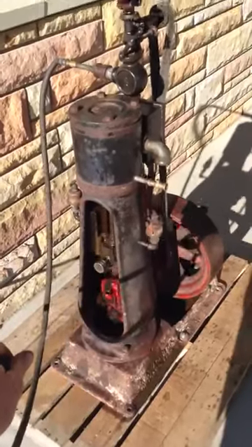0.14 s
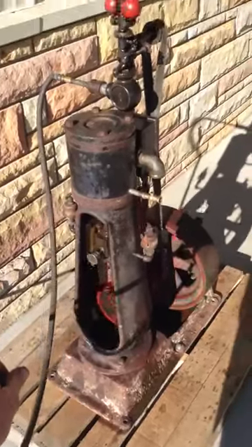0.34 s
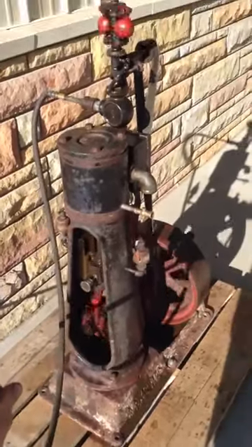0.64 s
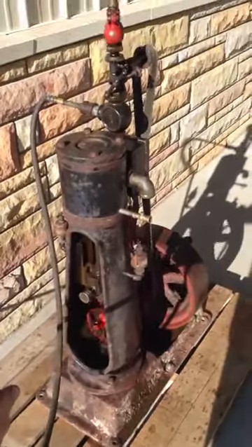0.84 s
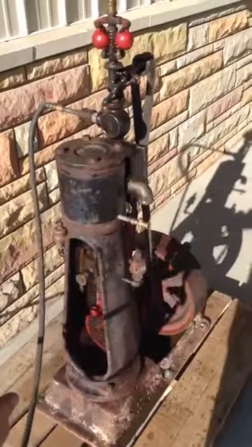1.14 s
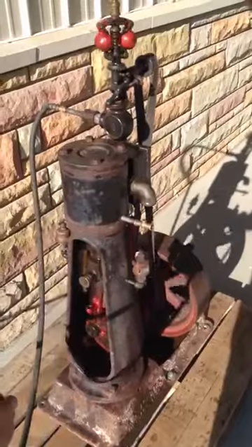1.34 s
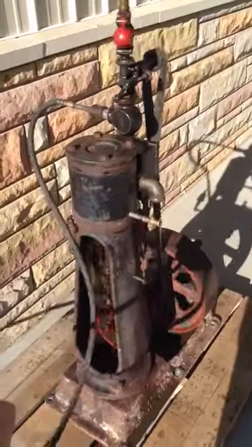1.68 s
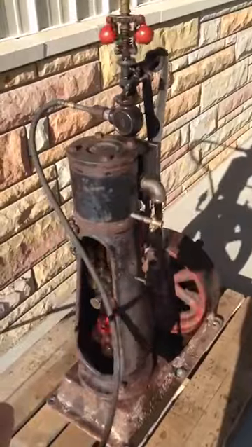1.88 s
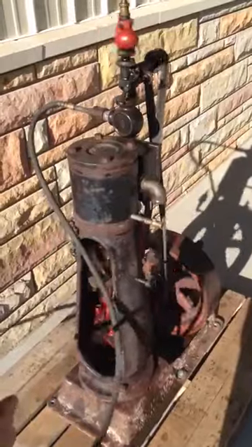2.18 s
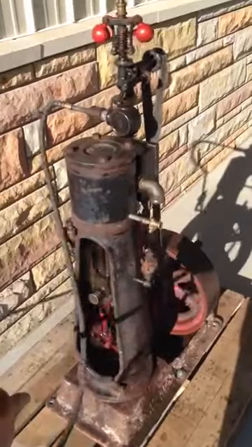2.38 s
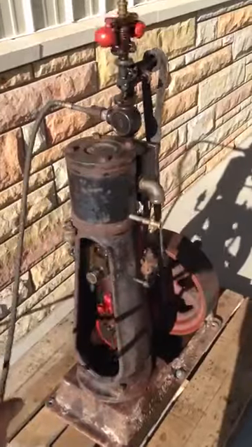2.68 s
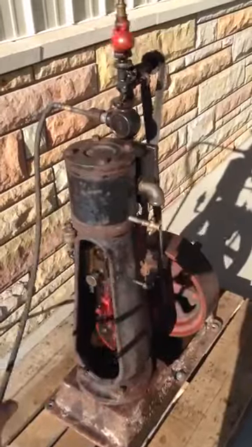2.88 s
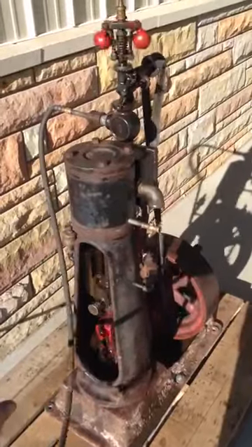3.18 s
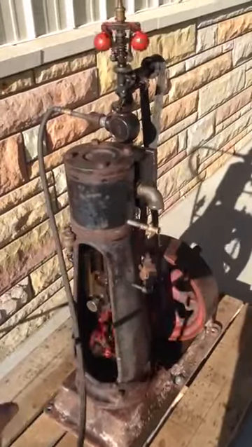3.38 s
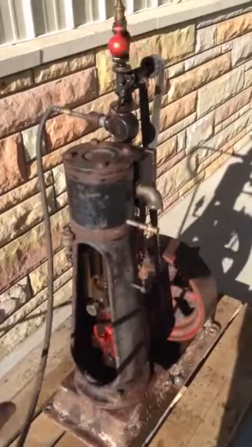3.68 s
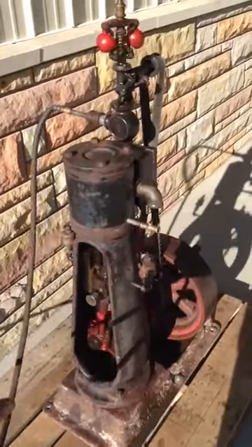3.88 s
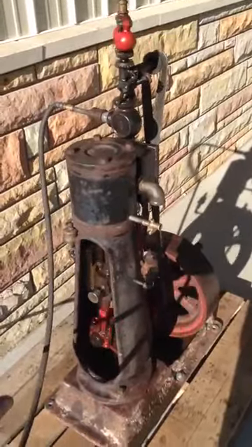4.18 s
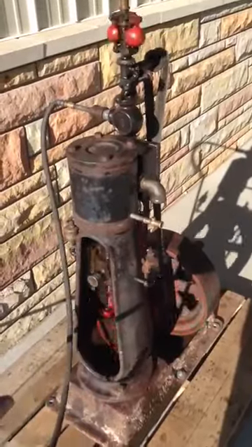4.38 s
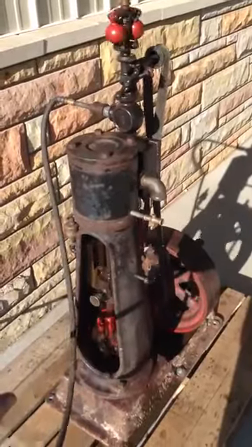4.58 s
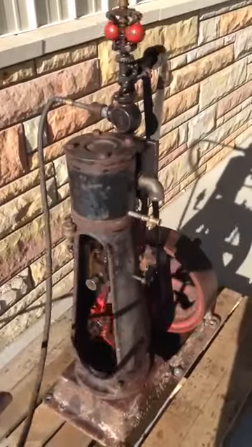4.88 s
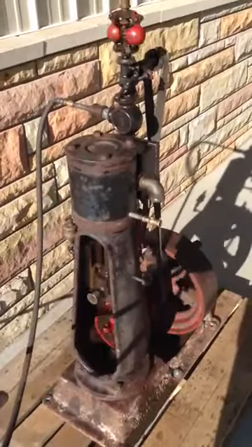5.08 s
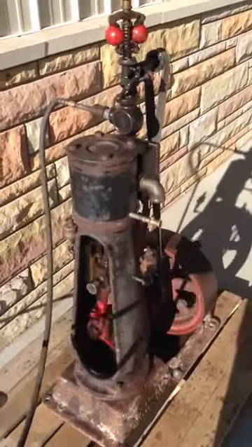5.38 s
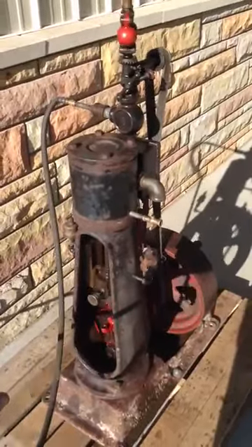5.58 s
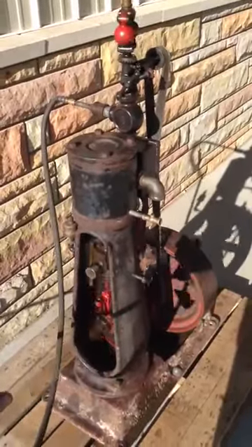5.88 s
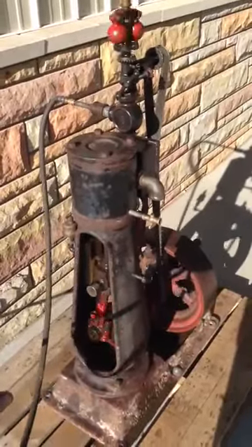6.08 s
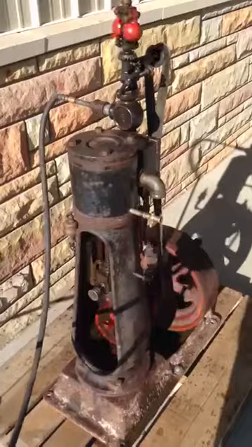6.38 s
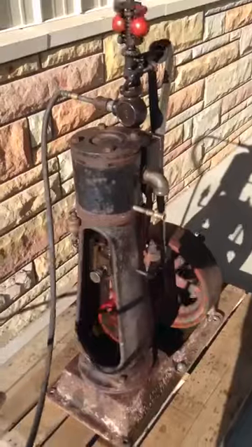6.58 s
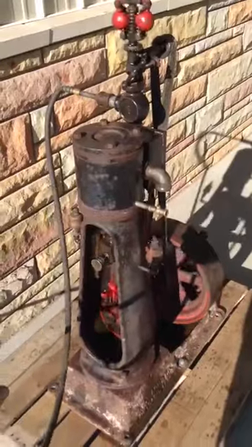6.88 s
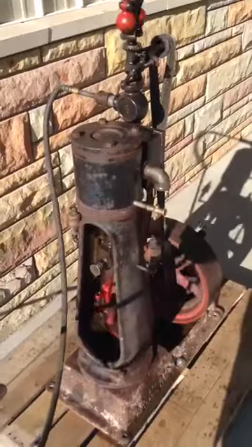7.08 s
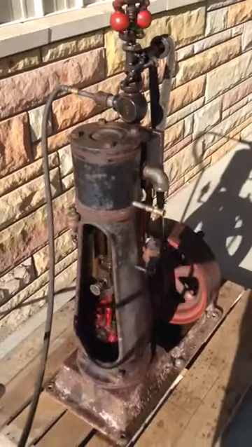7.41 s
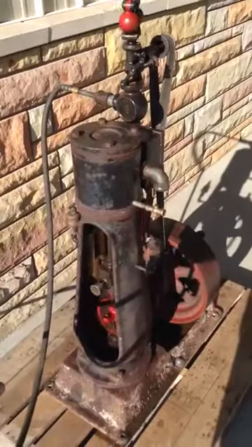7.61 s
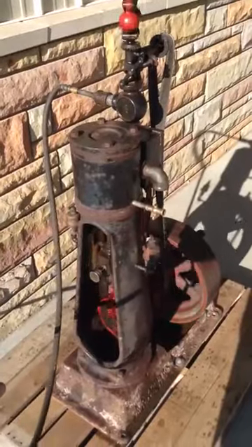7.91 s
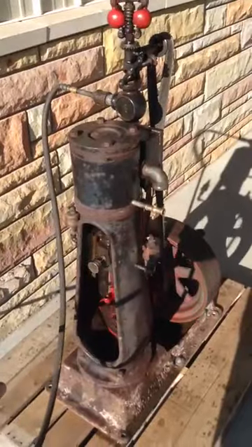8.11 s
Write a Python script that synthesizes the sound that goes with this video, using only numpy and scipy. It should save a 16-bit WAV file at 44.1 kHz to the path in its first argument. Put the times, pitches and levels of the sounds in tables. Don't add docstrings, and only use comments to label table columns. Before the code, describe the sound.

A valve hisses faintly, then a burst of compressed air drives rapid hard chuffs from a small engine, which slow into soft puffs and thumps.

```python
import sys
import numpy as np
from scipy import signal
from scipy.io import wavfile
from scipy.ndimage import uniform_filter1d

SR = 44100
rng = np.random.default_rng(int(sys.argv[2]) if len(sys.argv) > 2 else 0)


def int16_out(signal):
    q = np.round(np.clip(np.atleast_2d(signal).T, -1, 1) * 32767)
    wavfile.write(sys.argv[1], SR, q.astype(np.int16))


def magnitude_from_level(level_db):
    exponent = np.asarray(level_db, float) / 20
    return 10 ** exponent


N = 363825

# time in seconds, puff in dB, thump in dB.
UPPER_CENTRES = [(2.461, -55, -20), (2.62, -22, -22), (2.799, -16, -23), (2.988, -17, -22.5),
                 (3.19, -18, -25.5), (3.418, -17.5, -25), (3.667, -23, -29), (3.916, -23.5, -30),
                 (4.209, -26, -28.5), (4.531, -23, -30), (4.904, -24.5, -32.5), (5.354, -27.5, -32.5),
                 (5.939, -31, -44)]
# time in seconds, puff in dB, thump in dB, dip while the ports are shut before it in dB.
LOWER_CENTRES = [(2.546, -17, -31, -2.5), (2.703, -31, -25.5, 0), (2.882, -24, -26, 0.5),
                 (3.09, -47, -26, -1), (3.321, -30, -34, -2.5), (3.555, -25.5, -30, -4),
                 (3.8, -27.5, -35.5, -9), (4.075, -27.5, -42, -7), (4.382, -28, -35, -8),
                 (4.732, -32, -37, -8.5), (5.149, -33.5, -38, -5), (5.661, -34.5, -44, -7),
                 (6.383, -46, -46, -6)]
# time in seconds, puff in dB, dip before it in dB.
MIDWAY_PORTS = [(2.583, -16, -11), (2.679, -38, -4), (2.723, -39, -4.5), (2.91, -25, -2), (2.957, -21, -11),
                (3.038, -39, 1), (3.148, -22, -7), (3.258, -24, -3.5), (3.614, -25, -5.5),
                (3.722, -27.5, 0), (3.855, -44, -7), (4.132, -29, -4), (4.259, -31, -3.5),
                (4.444, -29.5, -0.5), (4.589, -31, 4), (4.829, -29, -4), (4.989, -32.5, 1),
                (5.253, -33.5, -1), (5.592, -46, -3), (5.811, -38.5, -3), (6.029, -52, 5)]
# time in seconds, puff in dB, dip before it in dB.
VALVE_SNAPS = [
    (5.459, -30.5, -3.5),
    (6.084, -28.5, -4),
]


def exhaust(flow, jet):
    # start in seconds, peak in dB, low modes in dB, hold in seconds, decay in seconds.
    driven_chuffs = [(1.727, -2, -4, 0.028, 0.054), (1.894, 2, -5.5, 0.019, 0.052),
                     (1.949, -7.5, 0.5, .017, 0.052), (2.007, 0.5, -6.5, 0.031, 0.022),
                     (2.058, -4, 0, 0.026, 0.037), (2.107, 1, -2, 0.024, 0.013),
                     (2.155, -7, 2, 0.021, .018), (2.201, -1, -11, 0.021, 0.0096),
                     (2.25, -8, 2, 0.014, 0.019), (2.288, 0, -5.5, 0.012, 0.045),
                     (2.376, -1, -4, 0.015, 0.0057), (2.43, -9.5, -22, .017, 0.022)]
    # frequency in Hz, width in Hz, level in dB.
    driven_modes = [(976, 60, 4.5), (1760, 190, 6), (2040, 90, 4), (3150, 200, -4), (3650, 160, -1),
                    (4090, 170, -4), (4730, 300, -8.5), (5240, 120, -3), (6150, 60, -8)]
    coasting_modes = [(1739, 110, 2), (2065, 74, 4.5), (2298, 59, 1.5), (3185, 564, -2.5), (4010, 88, -9),
                      (4874, 114, 3), (5204, 65, 1.5), (5450, 150, -5), (5900, 27, -1), (6430, 190, -6),
                      (7870, 720, -8)]
    # frequency in Hz, level in dB.
    blast_colour = [(180, -37), (300, -6.5), (534, -20.5), (1000, -9), (1480, -10), (1740, -6), (2490, -14),
                    (3970, -9), (8000, -17.5), (10400, -15.5), (17600, -120)]
    flow_colour = [(290, 15), (500, -10.5), (786, -20), (1040, 12.5), (1490, -13.5), (2030, 5.5),
                   (2680, -19.5), (3610, 3), (7000, -12), (9100, -33), (15400, -120)]
    jet_colour = [(3240, -44), (5500, -5), (8340, 2.5), (10800, 2.5), (12900, -5.5), (14700, 8),
                  (15500, -10)]
    # frequency in Hz, width in Hz, level in dB.
    mouth_modes = [(6250, 150, -3), (7700, 250, -3), (8450, 200, -2), (10150, 200, -4), (11350, 250, -3),
                   (13000, 250, -3)]
    driven_from_s, driven_to_s = 1.7, 2.52
    bright_db, rise_s = 0.3, 0.0034
    jet_lag_s = 0.0046

    t = np.arange(N) / SR
    driven = np.clip(np.minimum(t - driven_from_s, driven_to_s - t) / 0.01, 0, 1)
    flow = flow * magnitude_from_level(-9 * np.clip((t - 6.5) / 0.87, 0, 1))
    chuffs = [(s, db, low_db, bright_db, decay, rise_s, hold) for s, db, low_db, hold, decay in driven_chuffs]
    hard = strokes(chuffs, crest_db=14.5)
    soft = strokes(puffs(), crest_db=11.0)

    blast = pipe(driven_modes, blast_colour, ring_db=-1.5, patchy_db=3.0, ticks_per_s=500, tick_db=-2.0)
    coast = pipe(coasting_modes, flow_colour, ring_db=0.0, patchy_db=3.5, ticks_per_s=200, tick_db=-0.5)
    out = blown(blast, flow * np.sqrt(driven), hard, lowest_hz=905)
    out += blown(coast, flow * np.sqrt(1 - driven), soft, lowest_hz=1430)

    jet_power = hard[2] + np.roll(soft[2], round(jet_lag_s * SR)) + jet ** 2
    jet_hiss = hiss_through(coloured(jet_colour, patchy_db=2.0, rate=35.0), mouth_modes)
    return out + np.sqrt(jet_power) * jet_hiss


def puffs():
    # time in seconds, level in dB.
    creep_puffs = [
        (.004, -34.5),
        (0.265, -31.5),
        (.509, -35),
    ]
    usual_turn_s, upper_lead_s = 0.17, 0.013
    slow_dull_db = -8
    stretch = (np.gradient([row[0] for row in UPPER_CENTRES]) / usual_turn_s) ** 0.37
    out = []
    for (s, db, _), k in zip(UPPER_CENTRES, stretch):
        out.append((s - upper_lead_s * k, db, -6, slow_dull_db * (k - 1), 0.011, 0.011 * k, 0.024 * k))
    kinds = [(LOWER_CENTRES, (3.2, 0, 0.0041, 0.003, 0.012)),
             (MIDWAY_PORTS, (-4.5, -5.5, 0.041, 0.005, 0.014)),
             (VALVE_SNAPS + creep_puffs, (-1.1, -3, 0.01, 0.002, 0.012))]
    return out + [(*row[:2], *kind) for rows, kind in kinds for row in rows]


def strokes(rows, crest_db):
    power = np.zeros((3, N))
    for s, peak_db, low_db, bright_db, decay, rise_s, hold in rows:
        at = round(s * SR)
        t = np.arange(min(SR // 2, N - at)) / SR
        opening = 1 - np.exp(-t / max(rise_s, .0005))
        bleeding = np.exp(-np.maximum(t - hold, 0) / max(decay, .003))
        gains = magnitude_from_level(peak_db - crest_db + np.array([[low_db], [0], [bright_db]]))
        power[:, at:at + len(t)] += (gains * opening * bleeding) ** 2
    return power


def pipe(modes, colour, ring_db, patchy_db, ticks_per_s, tick_db):
    struck = rng.random(N) < ticks_per_s / SR
    force = magnitude_from_level(1.5 * np.minimum(rng.exponential(1, N), 4))
    rattle = struck * force * rng.choice([-1, 1], N)
    drive = rng.standard_normal(N) + magnitude_from_level(tick_db) * rms_one(rattle)
    rings = np.zeros(N)
    for k, (hz, width, db) in enumerate(modes):
        mode = resonate(resonate(drive, hz, 1.45 * width), hz, 1.45 * width)
        rings += (-1) ** k * magnitude_from_level(db + patchy_db * drift(25.5)) * mode
    return rms_one(magnitude_from_level(ring_db) * rms_one(rings) + coloured(colour, patchy_db=2.5, rate=26.0))


def blown(sound, steady, power, lowest_hz):
    low, high = cut(sound, 2600, "low"), cut(sound, 2600, "high")
    below, pair = cut(low, lowest_hz, "low"), cut(low, lowest_hz, "high")
    out = steady * magnitude_from_level(-12.5) * rms_one(below)
    out += np.sqrt(power[0] + (steady * magnitude_from_level(-4.5)) ** 2) * rms_one(pair)
    return out + np.sqrt(power[1] + (steady * magnitude_from_level(-2.5)) ** 2) * rms_one(high)


def port_gain():
    # time in seconds, depth in dB, half length in seconds.
    driven_laps = [
        (1.713, -21, 0.0067),
        (1.865, -4.5, 0.063),
    ]
    lower_s, midway_s = 0.023, 0.021
    t = np.arange(0, N + 20, 20) / SR
    dips = driven_laps + [(s - lower_s, db, 0.023) for s, _, _, db in LOWER_CENTRES]
    dips = dips + [(s - midway_s, db, 0.0064) for s, _, db in MIDWAY_PORTS]
    dips = dips + [(s - lower_s, db, 0.023) for s, _, db in VALVE_SNAPS]
    gain_db = sum(db * np.exp(-((t - s) / half) ** 2) for s, db, half in dips)
    return np.interp(np.arange(N) / SR, t, magnitude_from_level(gain_db))


def crank_half_turns():
    centres = np.sort([row[0] for row in UPPER_CENTRES + LOWER_CENTRES])
    return np.interp(np.arange(N) / SR, centres, np.arange(len(centres)), left=-.5, right=-.5)


def stroke_gain(half_turns):
    # first half of the travel in dB, second half in dB.
    stroke_rings = [(3, -6), (2.5, 4.5), (1, 4), (-3, 6.5), (-5, -8), (-11, 11), (2, 6), (0, 10), (-2, 1),
                    (-12, 10), (-10, 1), (-1, 2), (-2, 7), (-3, 4), (-2, 1), (-1, 1), (1, 5), (0, 6),
                    (4, 7), (-5, 12), (6, 4), (-4, 5), (4, -11), (-17, 5.5), (2, 3)]
    return np.interp(2 * half_turns - .5, np.arange(2 * len(stroke_rings)), np.ravel(stroke_rings), left=0)


def cylinder_ring():
    hz, width_hz = 1023.5, 12.8
    once = resonate(rng.standard_normal(N), hz, width_hz)
    return evened(resonate(once, hz, 6.1 * width_hz), window_s=0.016)


def thumps():
    # time in seconds, peak in dB,
    # pitch in Hz.
    further_thumps = [(0.029, -40.5, 265), (0.277, -43, 226), (.39, -43, 287), (0.519, -34.5, 303),
                      (.713, -55, 208), (0.906, -45, 305), (0.98, -41, 293), (1.061, -48, 192),
                      (1.502, -43, 202), (1.555, -38.5, 208), (1.902, -24, 350), (1.951, -29, 217),
                      (2.014, -31, 326), (2.094, -22, 321), (2.19, -26, 288), (2.289, -28, 293),
                      (2.35, -23, 228), (5.46, -53, 232), (6.077, -44.5, 280)]
    lag_s, rise_s, decay_s = 0.00384, 0.0047, 0.011
    out, t = np.zeros(N + SR), np.arange(SR // 5) / SR
    centres = [(row[0] + lag_s, row[2], 287.3) for row in UPPER_CENTRES]
    centres += [(row[0] + lag_s, row[2], 280) for row in LOWER_CENTRES]
    bounces = [(s + .026, db - 9, hz * 1.1) for s, db, hz in centres]
    for s, peak_db, hz in further_thumps + centres + bounces:
        shape = (1 - np.exp(-t / rise_s)) * np.exp(-t / decay_s)
        turn = 2 * np.pi * hz * t * (1 + 2.5 * t)
        wave = np.sin(turn) + 0.27 * np.sin(1.2 * turn) * np.exp(-t / 0.025)
        wave += 0.36 * np.sin(2 * np.pi * 221 * t) * np.exp(-t / 0.034)
        wave += 0.04 * np.sin(2 * np.pi * 80 * t)
        out[round(s * SR):][:len(t)] += magnitude_from_level(peak_db + 4.5) * shape * wave
    return out[:N]


def ticks():
    # time in seconds, peak in dB.
    crosshead_ticks = [
        (.705, -30),
        (3.427, -20),
        (3.925, -23),
        (4.214, -21),
        (4.535, -30),
        (5.593, -38),
    ]
    out, t = np.zeros(N), np.arange(SR // 50) / SR
    for s, peak_db in crosshead_ticks:
        contact = np.exp(-t / .003) * rng.standard_normal(len(t))
        out[round(s * SR):][:len(t)] += magnitude_from_level(peak_db - 4) * contact
    return cut(cut(out + 1e-18, 2500, "high", order=2), 10000, "low", order=2)


def knocks():
    # time in seconds, level in dB, scatter in seconds.
    slack_knocks = [
        (0.711, -37.5, 0.016),
        (1.502, -39, 0.12),
        (6.088, -39, 0.015),
    ]
    # frequency in Hz, level in dB, 60 dB decay time in seconds.
    linkage_modes = [(476, 1, 0.03), (700, -2, 0.025), (856, -3, 0.025), (1150, -2, .018), (1420, -5, 0.02),
                     (2390, -3, 0.012), (3220, -6, 0.012), (4700, -8, .025)]
    contact, t = np.zeros(N), np.arange(SR // 5) / SR
    for s, level_db, scatter in slack_knocks:
        contact[round(s * SR):][:len(t)] += magnitude_from_level(level_db) * np.exp(-t / scatter) * rng.standard_normal(len(t))
    return sum(magnitude_from_level(db + 14.5) * resonate(contact + 1e-18, hz, 1.63 / t60) for hz, db, t60 in linkage_modes)


def wheezes():
    # start in seconds, low pair in dB, high pair in dB, hold in seconds, decay in seconds.
    faint_wheezes = [(0.26, -42, -54, 0.0091, 0.0069), (0.506, -51, -55, 0.027, 0.026),
                     (0.862, -58, -70, .07, .02), (1.332, -46, -70, .012, 0.0071),
                     (4.081, -35, -50, 0.0079, .004), (4.729, -41, -54, 0.011, .01),
                     (5.147, -38.5, -45, .011, 0.0063), (5.661, -45, -59, 0.01, 0.016),
                     (6.382, -49.5, -53, 0.014, .008), (6.46, -59, -70, .02, .015),
                     (6.594, -62, -73, 0.025, .015), (6.80, -59, -55, .06, .02),
                     (6.9, -56, -55, .015, .012), (7.155, -53.5, -68, 0.013, 0.0091),
                     (7.823, -49, -66, 0.038, .006), (7.875, -49.5, -52, .025, 0.022),
                     (7.925, -57, -64, .02, 0.085)]
    # frequency in Hz, width in Hz.
    low_pair = [(1800, 110), (2060, 90)]
    high_pair = [(3900, 400), (4900, 110)]
    level, t = np.zeros((2, N)), np.arange(SR // 4) / SR
    for s, low_db, high_db, hold, decay in faint_wheezes:
        shape = (1 - np.exp(-t / 0.0028)) * np.exp(-np.maximum(t - hold, 0) / decay)
        level[:, round(s * SR):][:, :len(t)] += magnitude_from_level(np.array([[low_db], [high_db]])) * shape
    white = rng.standard_normal(N)
    pairs = []
    for modes in (low_pair, high_pair):
        rings = sum(resonate(resonate(white, hz, w), hz, 2 * w) for hz, w in modes)
        pairs.append(evened(rings, window_s=0.0057))
    return np.sum(level * pairs, axis=0)


def squeaks():
    lift = whistle(1.676, .017, -19, from_hz=11300, to_hz=9300, breath_hz=600, tone=1.1, bend=1.5)
    creak = whistle(6.28, .09, -60, from_hz=3680, to_hz=3350, breath_hz=70, tone=1.3, bend=.45)
    chirp = whistle(7.93, .035, -61, from_hz=3850, to_hz=4080, breath_hz=90, tone=1, bend=1)
    return lift + creak + chirp


def whistle(s, half, level_db, from_hz, to_hz, breath_hz, tone, bend):
    u = (np.arange(N) / SR - s) / half
    hz = from_hz + (to_hz - from_hz) * np.clip((u + 1) / 2, 0, 1.3) ** bend
    breath = rms_one(cut(rng.standard_normal(N), breath_hz, "low", order=2))
    return magnitude_from_level(level_db) * np.exp(-u ** 2) * (tone + breath) * np.sin(2 * np.pi * np.cumsum(hz) / SR)


def wall(x):
    # delay in seconds, level in dB.
    wall_echoes = [(.0045, -16), (.011, -14.5), (.023, -16)]
    dull = signal.lfilter([.5], [1, -.5], x)
    return x + sum(magnitude_from_level(db) * np.pad(dull, (round(s * SR), 0))[:N] for s, db in wall_echoes)


def valve_leak():
    # time in seconds, level in dB.
    early_leak = [(0.0, -43.5), (.1, -47), (.35, -46), (.522, -42), (.6, -45), (.69, -44.5), (.71, -41.5),
                  (.8, -42), (1.0, -43), (1.408, -41.5), (1.518, -28), (1.65, -30), (1.672, -25),
                  (1.7, -31), (1.72, -30)]
    late_leak = [(6.2, -86), (6.32, -54), (6.46, -42.5), (6.77, -42), (6.86, -37), (6.91, -40),
                 (8.17, -40.5), (8.25, -37)]
    # frequency in Hz, level in dB.
    early_colour = [(1470, -48), (2500, -10.5), (3050, -12.5), (4010, -6), (5970, -1.5), (14100, 0),
                    (15500, -4)]
    late_colour = [(1470, -52), (2500, -16.5), (3160, -12), (5930, -3.5), (11000, 2), (14100, 4),
                   (15300, -7)]
    # frequency in Hz, width in Hz, level in dB.
    valve_modes = [(6170, 200, -7), (7200, 300, -7), (8550, 350, -4), (9890, 300, -7), (11300, 400, -5),
                   (12800, 250, -6), (13700, 250, -8)]
    hiss = magnitude_from_level(4.5) * in_time(early_leak)[0] * coloured(early_colour, patchy_db=0.65, rate=17)
    hiss = hiss + in_time(late_leak)[0] * coloured(late_colour, patchy_db=0.5, rate=25)
    return np.sqrt(np.mean(hiss ** 2)) * hiss_through(hiss, valve_modes)


def frame_rumble(pause):
    # time in seconds, level in dB.
    wheel_shake = [(0.0, -53), (1.0, -60), (1.4, -71), (1.54, -47.5), (1.7, -55), (1.9, -37.5),
                   (2.5, -36.5), (5.8, -56), (6.25, -63.5), (8.25, -74)]
    # frequency in Hz, level in dB.
    rumble_colour = [(24, -72), (40, -40.5), (199, -2), (241, -7), (300, -7), (371, -14.5), (455, -4),
                     (560, -6), (700, -11), (910, -36), (1540, -120)]
    calm_db = -1.5 * (1 - pause)
    return in_time(wheel_shake)[0] * magnitude_from_level(calm_db) * coloured(rumble_colour, patchy_db=2.5, rate=9.3)


def quiet_yard():
    # frequency in Hz, level in dB.
    yard_colour = [(24, -82), (40, -37.5), (200, -3), (500, -25), (570, -15), (963, -9.5), (1180, -15.5),
                   (1250, -14), (3500, -15.5), (4550, -51), (7700, -120)]
    return magnitude_from_level(-58.5) * coloured(yard_colour, patchy_db=2.5, rate=4.0)


def hiss_through(x, modes):
    return rms_one(x + sum(magnitude_from_level(db + 4 * drift(3.0)) * resonate(x, hz, w) for hz, w, db in modes))


def coloured(spectrum, patchy_db, rate):
    hz, level = np.transpose(spectrum)
    bands = round(3 * np.log2(hz[-1] / hz[0])) + 1
    edges = np.geomspace(hz[0], min(hz[-1], .45 * SR), bands + 1)
    white, together, out = rng.standard_normal((2, N)), drift(rate), 0
    for k, (low, high) in enumerate(zip(edges, edges[1:])):
        band = cut(white[k % 2], [low, high], "band", order=2)
        centre_db = np.interp(np.log(low * high) / 2, np.log(hz), level)
        out = out + band * magnitude_from_level(centre_db + patchy_db * (0.33 * together + drift(rate)))
    return rms_one(out)


def drift(rate):
    r = np.exp(-80 * np.pi * rate / SR)
    white = rng.standard_normal(N // 40 + 2002)
    slow = signal.lfilter([1], [1, -2 * r, r * r], white)[2000:]
    return np.interp(np.arange(N) / 40, np.arange(len(slow)), rms_one(slow))


def resonate(x, hz, width_hz):
    r = np.exp(-np.pi * width_hz / SR)
    poles = [1, -2 * r * np.cos(2 * np.pi * hz / SR), r * r]
    return signal.lfilter(np.array([1, 0, -1]) * (1 - r * r) / 2, poles, x)


def cut(x, hz, kind, order=4):
    return signal.sosfilt(signal.butter(order, hz, kind, fs=SR, output="sos"), x)


def evened(x, window_s):
    power = uniform_filter1d(x ** 2, round(window_s * SR))
    return rms_one(x / np.sqrt(power + .05 * np.mean(x ** 2)))


def rms_one(x):
    return x / np.sqrt(np.mean(x ** 2) + 1e-20)


def in_time(rows):
    s, *columns = np.transpose(rows)
    return [magnitude_from_level(np.interp(np.arange(N) / SR, s, c, left=-150, right=-150)) for c in columns]


def scene():
    # time in seconds, pipe flow in dB, share ringing the cylinder in dB.
    air_flow = [(0.0, -50.5, -2.5), (0.69, -52.5, -9), (1.05, -54.5, -25), (1.31, -52.5, 3.5),
                (1.45, -58, -20), (1.54, -32.5, 4), (1.68, -43, -7), (1.72, -19, -8), (1.9, -20.5, -10),
                (2.3, -19.5, -14), (2.44, -22, 2), (2.6, -30, -2.5), (3.05, -32, -2.5), (3.9, -36.5, -3.5),
                (4.9, -44, -10), (5.9, -52.5, 0.5), (6.23, -59, -9), (8.25, -50.5, -13)]
    # time in seconds, level in dB.
    mouth_jet = [(1.716, -39), (1.73, -11), (1.77, -24.5), (1.96, -26.5), (2.17, -22.5), (2.27, -25.5),
                 (2.42, -30), (2.56, -31.5), (5.6, -55), (6.3, -60.5)]
    (flow, share), (jet,), shut = in_time(air_flow), in_time(mouth_jet), port_gain()
    half_turns = crank_half_turns()
    pause = np.cos(np.pi * half_turns) ** 2
    ring = flow * share * magnitude_from_level(-7 * pause + stroke_gain(half_turns))
    flow = flow * magnitude_from_level(-1.5 * pause)
    engine = exhaust(flow * shut, jet * shut) + magnitude_from_level(-4.0) * ring * shut * cylinder_ring()
    engine += thumps() + ticks() + knocks() + wheezes() + squeaks()
    mono = wall(engine) + valve_leak() + shut * frame_rumble(pause) + quiet_yard()
    return np.array([mono, mono])


def roll_off(x):
    return signal.sosfilt(signal.butter(12, 15330, fs=SR, output="sos"), x)


def record(dry):
    throb = cut(dry ** 2, [18, 60], "band", order=2)
    self_noise = magnitude_from_level(-54) * rms_one(cut(rng.standard_normal(N), 11700, "high"))
    heard = cut(dry, 45, "high", order=2) + magnitude_from_level(-46) * throb + self_noise
    rounded = .72 * np.tanh(cut(heard, 15250, "low", order=16) / .72)
    return roll_off(rounded)


dry = scene()
out = record(dry)
int16_out(out)
```